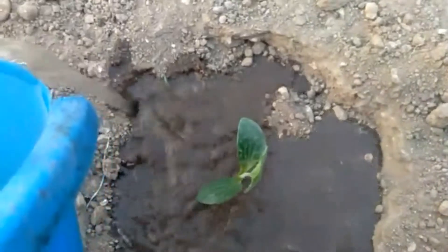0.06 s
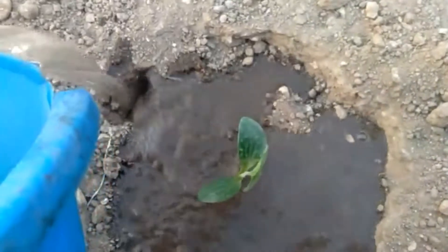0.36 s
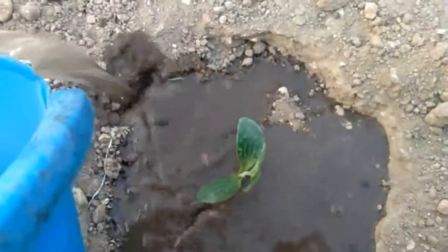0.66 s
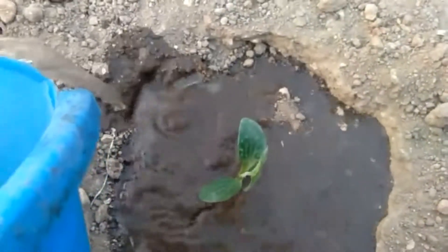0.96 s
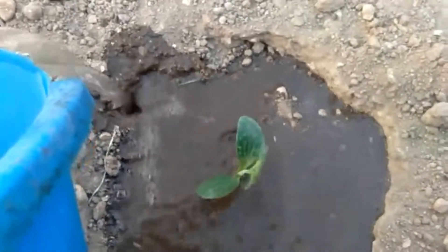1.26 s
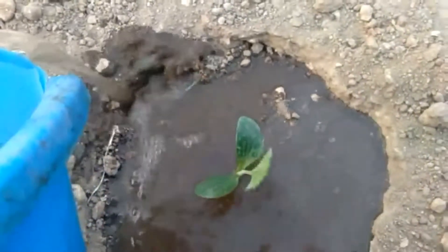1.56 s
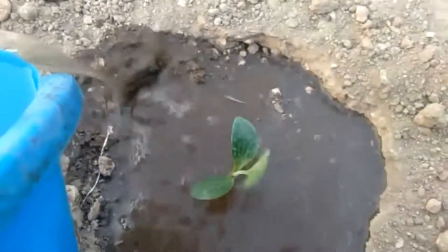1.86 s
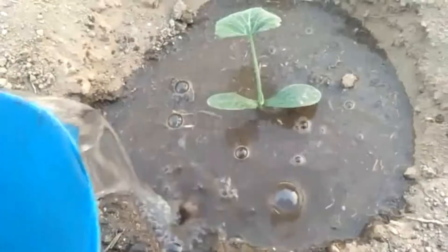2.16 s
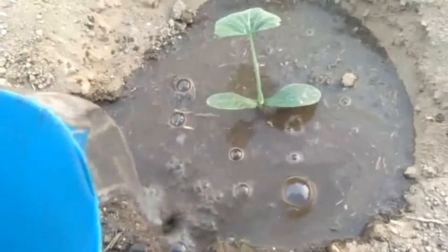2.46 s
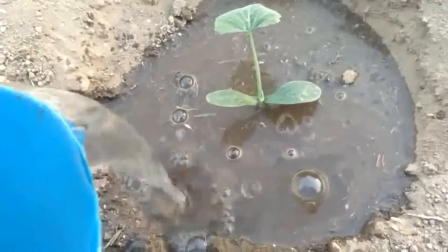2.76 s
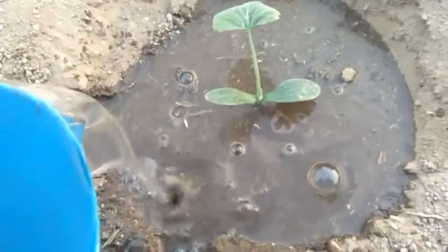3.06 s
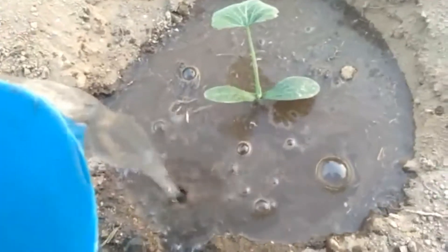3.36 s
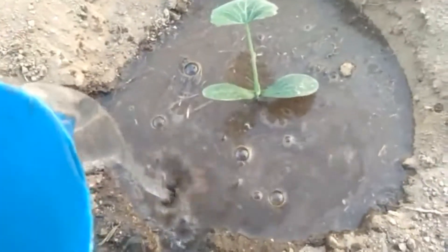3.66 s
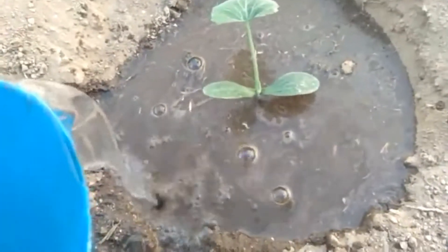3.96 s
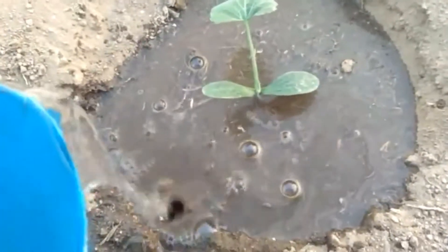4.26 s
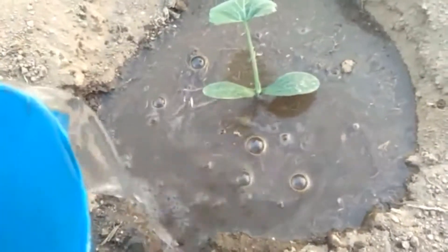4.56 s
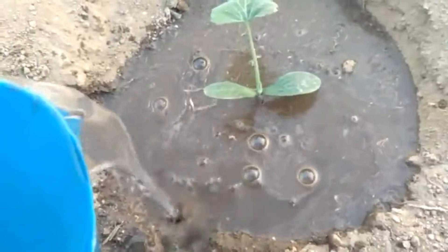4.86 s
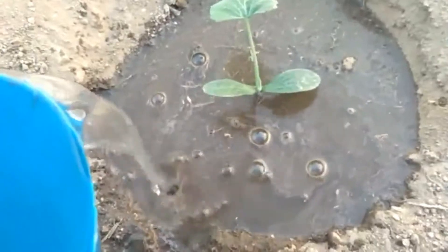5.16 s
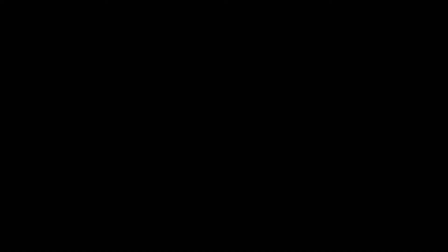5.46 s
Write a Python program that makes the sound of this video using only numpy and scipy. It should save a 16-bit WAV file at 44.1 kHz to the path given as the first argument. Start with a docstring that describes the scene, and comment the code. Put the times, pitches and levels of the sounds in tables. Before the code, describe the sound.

Two outdoor pours of water from a bucket: a soft splatter on soil under growing wind rumble, then a bubbly patter into a muddy pool.

```python
"""Water pours from a plastic bucket into the muddy basins of two seedlings, one after the other. The stream
breaks into slugs that spatter on the mud and trap tiny, quickly damped bubbles, with plips, chirps and ticks on
top. The first pour lands on soil; then the scene changes and the second drums softly into a pool. Outdoor air
lies underneath, and during the first pour wind buffets the microphone harder and harder."""
import sys
import numpy as np
from scipy import signal
from scipy.fft import rfft, irfft
from scipy.io import wavfile
from scipy.ndimage import uniform_filter1d, map_coordinates

SR = 44100
rng = np.random.default_rng(int(sys.argv[2]) if len(sys.argv) > 2 else 0)


def unload_audio(sound):
    """Save the sound as a 16-bit wav file, at the path given as the first command line argument."""
    columns = np.transpose(np.atleast_2d(sound))
    # keep every value between -1 and 1, then stretch to whole-number steps
    steps = np.round(np.clip(columns, -1, 1) * 32767)
    wavfile.write(sys.argv[1], SR, steps.astype(np.int16))


N = 252239
T = np.arange(N) / SR


def undb(db):
    """Decibels to gain."""
    return 10 ** (np.asarray(db) / 20)


def unit(x):
    """Scale to rms 1."""
    return x / np.sqrt(np.mean(x ** 2) + 1e-18)


def curve(rows):
    """An automation lane: (time, value) points joined by straight lines."""
    return np.interp(T, *np.transpose(rows))


def swell(middle_s, half_s):
    """A smooth rise and fall around one moment, 1 at its top."""
    return np.exp(-((T - middle_s) / half_s) ** 2)


def flicker(seconds):
    """A random wobble of rms 1 that changes over about this time."""
    width = int(seconds * SR)
    return unit(uniform_filter1d(uniform_filter1d(rng.standard_normal(N), width), width))


def gate(start_s, end_s, fade_s=0.0042):
    """Open between two times, with quick fades."""
    return np.clip(np.minimum(T - start_s, end_s - T) / fade_s, 0, 1)


def add(out, start_s, sound):
    """Mix a short sound into a track."""
    i = min(max(int(start_s * SR), 0), N - 1)
    out[i:i + len(sound)] += sound[:N - i]


def colour(x, points, size=4096):
    """EQ through (Hz, dB) points, minimum phase so that attacks stay sharp; comes out at rms 1."""
    hz, db = np.transpose(points)
    bin_hz = np.maximum(np.fft.rfftfreq(size, 1 / SR), 1)
    gain = undb(np.interp(np.log(bin_hz), np.log(hz), db))
    cepstrum = irfft(np.log(gain))
    cepstrum[1:size // 2] *= 2
    cepstrum[size // 2 + 1:] = 0
    impulse = irfft(np.exp(rfft(cepstrum)))
    return unit(signal.fftconvolve(x, impulse)[:N])


def smear(x, seconds):
    """Give every impulse an exponential tail."""
    return signal.lfilter([1], [1, -np.exp(-1 / (seconds * SR))], x)


def steady(x, seconds=0.14):
    """Keep the fine grain of x but hold its slow level at 1."""
    width = int(seconds * SR)
    power = uniform_filter1d(uniform_filter1d(x ** 2, width), width)
    return x / np.sqrt(power + 1e-9)


# Tone of the outdoor bed: freq_hz, gain_db
AIR_EQ = [(30, -19), (100, -6.5), (330, 12), (500, -6), (1200, 0), (3000, -14.5), (9000, -13),
          (15000, -52.5)]
def outdoor_air():
    """A faint, even bed of dark noise."""
    return undb(-56) * colour(rng.standard_normal(N), AIR_EQ)


# Wind ride, a light breeze and then one growing gust: time_s, relative_db
WIND_RIDE = [(0, -46), (1.05, -44.5), (1.25, -30), (1.72, -31), (1.97, -22.5), (2.1, -18.5), (2.16, -65.5),
             (5.32, -42.5)]
# Soft puffs on top of the ride: middle_s, half_length_s, relative_db
WIND_PUFFS = [(0.114, 0.06, -38), (0.234, 0.048, -35), (0.496, 0.019, -29.5), (3.644, 0.038, -33.5),
              (5.05, 0.031, -48)]
# Tone of wind pressure on the microphone: freq_hz, gain_db
RUMBLE_EQ = [(20, -40), (45, -2.5), (80, 9), (150, 0), (300, -6.5), (500, -16), (800, -46), (1500, -51),
             (5000, -120)]
def wind_rumble(gustiness_db=9, trim_db=-1):
    """Turbulence presses on the microphone: a rough, low rumble that follows the breeze."""
    puffs = sum(undb(db) * swell(middle_s, half_s) for middle_s, half_s, db in WIND_PUFFS)
    breeze = undb(curve(WIND_RIDE)) + puffs
    gusts = unit(uniform_filter1d(rng.standard_normal(N), SR // 80))
    turbulence = rng.standard_normal(N) * undb(gustiness_db * gusts)
    rumble = steady(colour(turbulence, RUMBLE_EQ), seconds=0.012)
    return rumble * breeze * undb(trim_db)


# Thumps of the strongest eddies: middle_s, push_db, pitch_hz, core_db
# core_db is the level of the eddy's tight, higher-pitched core, before its 3.5 dB boost.
EDDY_HITS = [(0.16, -10, 270, -22), (0.314, -11.0, 190, -46), (0.579, -23.5, 159, -50),
             (0.664, -16.5, 107, -45), (0.83, -19.0, 158, -62), (0.908, -26.0, 171, -49),
             (1.171, -17.5, 210, -38), (1.228, -24, 168, -44), (1.258, -11.5, 148, -22.5),
             (1.299, -11, 212, -25), (1.367, -14.5, 157, -42), (1.404, -18, 227, -29),
             (1.533, -16.5, 141, -33), (1.552, -13, 177, -19.5), (1.612, -13, 212, -22),
             (1.619, -9.5, 180, -23), (1.657, -22.5, 172, -43), (1.675, -18, 96, -43),
             (1.765, -23.5, 120, -41), (1.773, -21, 115, -31.5), (1.832, -12.5, 136, -26),
             (1.846, -27, 115, -48), (1.877, -15.0, 164, -28), (1.908, -16, 235, -28),
             (1.922, -18.5, 190, -24), (1.948, -8, 128, -20.5), (1.963, -10.5, 170, -16.5),
             (1.966, -13.5, 176, -17), (1.977, -12.5, 121, -20), (2.003, -10, 296, -17),
             (2.01, -13, 278, -8), (2.02, -17.5, 166, -18), (2.036, -12.5, 124, -23),
             (2.086, -17, 194, -20), (2.098, -14.0, 210, -17), (5.035, -22.0, 120, -58)]
# Tone of the fine swirls around an eddy: freq_hz, gain_db
SWIRL_EQ = [(100, -5), (380, 3), (650, 0.5), (1200, -12.5), (1800, -47.5), (5000, -110)]
def wind_eddies(swirl_gate, push_cycles=0.54, core_hz=440, core_cycles=0.64, fray_s=0.007):
    """Each eddy pushes and pulls the diaphragm; its tight core frays into fine swirls."""
    thumps, fray = np.zeros(N), np.zeros(N)
    age = T[:4096] - T[2048]  # zero at the middle of the eddy
    for middle_s, push_db, hz, core_db in EDDY_HITS:
        push = np.sin(2 * np.pi * hz * age) * np.exp(-(age * hz / push_cycles) ** 2)
        core = np.cos(2 * np.pi * core_hz * age) * np.exp(-(age * core_hz / core_cycles) ** 2)
        add(thumps, middle_s + age[0], undb(push_db) * push + undb(core_db + 3.5) * core)
        add(fray, middle_s + age[0], undb(core_db - 11) * np.exp(-(age / fray_s) ** 2))
    swirls = fray * colour(rng.standard_normal(N), SWIRL_EQ)
    return thumps + swirls * swirl_gate


def reflected(x, echoes, sway=0.015):
    """Add close reflections whose delays drift a little as the hand sways."""
    drift = 1 + sway * flicker(0.38)
    return x + sum(gain * map_coordinates(x, [(T - delay_s * drift) * SR]) for delay_s, gain in echoes)


# Peaks and notches of the gap between pool and bucket wall: centre_hz, width_hz, gain_db
HOLLOW_BANDS = [(3120, 87, -8), (3920, 130, -3), (4440, 295, 2.5), (4610, 120, -5.5), (5690, 700, -6.5),
                (6370, 390, 7), (6750, 910, -5.5), (8830, 250, 4)]
def hollow(x):
    """The gap beside the bucket adds a hollow colour that stays put while the water moves."""
    for hz, width_hz, db in HOLLOW_BANDS:
        band = signal.lfilter(*signal.iirpeak(hz, hz / width_hz, fs=SR), x)
        x = x + (undb(db) - 1) * band
    return x


def bubble(hz, cycles, rise):
    """A trapped bubble swells briefly, rings down over `cycles` and rises in pitch."""
    age_cycles = np.arange(int(cycles * SR / hz) + 2) * hz / SR
    attack = 1 - np.exp(-(age_cycles / 2.6) ** 2)
    envelope = attack * np.exp(-np.log(1000) * age_cycles / cycles)
    phase = 2 * np.pi * age_cycles * (1 + rise * age_cycles / cycles)
    return envelope / envelope.max() * np.sin(phase)


def snap(start_s=2.931, decay_s=0.0012):
    """One surface bubble bursts close by: a sharp, very bright snap."""
    out, age = np.zeros(N), T[:1024]
    top_band = signal.butter(6, (8400, 14000), "band", fs=SR, output="sos")
    hiss = unit(signal.sosfilt(top_band, rng.standard_normal(len(age))))
    add(out, start_s, undb(-16) * bubble(hz=9400, cycles=21, rise=0.08))
    add(out, start_s, undb(-23) * hiss * np.exp(-age / decay_s))
    return out


# The sharpest ticks of flying drops: start_s, level_db, pitch_hz
TICK_HITS = [(0.223, -34, 7260), (2.478, -29.5, 4460), (2.585, -28, 4530), (2.757, -32.5, 7550),
             (3.137, -38, 6250), (3.21, -33.5, 7100), (3.306, -35, 11000), (3.34, -35.5, 9050),
             (3.462, -33, 6060), (3.477, -33, 7700), (3.785, -39, 8850), (3.819, -32, 7700),
             (3.894, -29.5, 4600), (4.103, -27, 5100), (4.142, -35, 8100), (4.2764, -38, 6550),
             (4.449, -29, 4340), (4.459, -34, 4400), (4.4826, -37, 6140), (4.594, -28.5, 4500),
             (4.613, -32.5, 8000), (4.66, -39, 9130), (4.68, -33, 8850), (4.809, -28, 4360),
             (4.816, -28.5, 4360), (4.866, -34, 4450), (4.885, -25.5, 4300), (4.897, -30, 4450),
             (4.939, -36, 4600), (5.036, -33.5, 6240)]
def ticks(mist_gain=0.34, mist_decay_s=0.0035):
    """Flying drops burst with a short, very bright tick and a spit of spray around the same pitch."""
    rings, mist, age = np.zeros(N), np.zeros(N), T[:1024]
    for start_s, db, hz in TICK_HITS:
        add(rings, start_s, undb(db) * bubble(hz, cycles=17, rise=0.081))
        noise = rng.standard_normal(len(age))
        band = signal.iirpeak(hz, Q=1.6, fs=SR)
        spray = unit(signal.lfilter(*band, signal.lfilter(*band, noise)))
        add(mist, start_s, undb(db) * spray * np.exp(-age / mist_decay_s))
    return rings + mist_gain * mist


# Larger bubbles that sing upward: start_s, level_db, start_pitch_hz
CHIRP_HITS = [(0.754, -34.5, 3300), (0.773, -34, 2380), (1.386, -26, 2650), (1.398, -26, 3030),
              (1.552, -32.5, 1576), (1.568, -32, 3780), (1.579, -38, 1310), (1.645, -28, 2550),
              (1.806, -30, 2850), (1.888, -36, 2950), (2.803, -33, 2680), (2.884, -37.5, 1180),
              (2.963, -31.5, 2340), (3.005, -28, 3320), (3.019, -30, 3520), (3.78, -25.5, 3280),
              (3.839, -31, 2250), (4.140, -41, 2130), (4.344, -26, 2880), (4.7423, -33, 3480),
              (4.937, -40, 4300), (5.007, -38.5, 3730), (5.128, -35, 2360)]
def chirps():
    """Bubbles that near the surface as they ring go up in pitch."""
    out = np.zeros(N)
    for start_s, db, hz in CHIRP_HITS:
        add(out, start_s, undb(db) * bubble(hz, cycles=50, rise=0.3))
    return out


# The loudest plips, where the stream traps a bubble: start_s, level_db, pitch_hz
PLIP_HITS = [(0.0313, -25, 2760), (0.3334, -27.5, 2060), (0.3651, -23, 2590), (0.579, -24, 2600),
             (0.7704, -26.5, 2560), (1.282, -27.5, 2280), (1.334, -27.5, 2170), (1.3808, -15.5, 2600),
             (1.5786, -25.5, 2210), (1.617, -28.5, 2730), (1.8055, -23, 2950), (1.8851, -21.5, 2800),
             (2.165, -25.5, 2000), (2.184, -25, 2200), (2.2477, -25.5, 2200), (2.3253, -24.5, 2110),
             (2.466, -23, 2390), (2.513, -27, 2620), (2.6505, -20, 2290), (2.7006, -17, 2480),
             (2.741, -24.5, 2740), (2.754, -20, 2740), (2.786, -21, 2780), (2.826, -31, 2250),
             (2.8424, -26.5, 2100), (2.909, -30.5, 2080), (2.945, -25.5, 2170), (2.9894, -19, 2140),
             (3.028, -24.5, 2520), (3.0308, -23, 2620), (3.045, -28.5, 2250), (3.086, -17, 2540),
             (3.138, -26, 2700), (3.1623, -30, 2500), (3.2088, -21, 2150), (3.274, -28, 2540),
             (3.291, -29, 2450), (3.3386, -16.5, 2380), (3.4068, -14, 2270), (3.463, -28, 2040),
             (3.561, -30.5, 2440), (3.587, -23, 2180), (3.597, -25, 2270), (3.675, -29, 2330),
             (3.6983, -26.5, 2410), (3.709, -30.5, 2090), (3.7613, -26, 2550), (3.784, -26, 2240),
             (3.946, -26.5, 3340), (3.9594, -18.5, 2340), (3.974, -25, 2290), (4.103, -31.5, 3440),
             (4.2198, -26, 2100), (4.2513, -28.5, 2170), (4.288, -26, 2670), (4.3427, -21.5, 2820),
             (4.375, -20, 2600), (4.4212, -23, 2200), (4.449, -28, 2810), (4.598, -27.5, 2770),
             (4.695, -29.5, 2440), (4.7789, -21, 2670), (4.807, -24.5, 2430), (4.8421, -21.5, 2670),
             (4.865, -29.5, 2850), (4.8825, -25, 2700), (4.896, -30, 2370), (4.9769, -21, 2430),
             (5.0216, -21, 2520), (5.035, -20.5, 2520), (5.0973, -24.5, 2850), (5.1334, -20.5, 2410),
             (5.166, -28.5, 2600), (5.225, -24.5, 2215), (5.309, -27, 2500)]
def plips(slap_s=0.001286, slap_gain=0.2, spit_gain=0.014, after_db=-11.5):
    """Large drops slap, spit and ring one bubble; as the crater closes a second one sings on, rising."""
    rings, slaps, age = np.zeros(N), np.zeros(N), T[:1024]
    slap_envelope = age / slap_s * np.exp(1 - age / slap_s)
    for start_s, db, hz in PLIP_HITS:
        noise = rng.standard_normal(len(age))
        after_hz = hz * np.exp(0.19 * noise[0])
        after_s = start_s + 0.0094 * np.exp(0.3 * noise[1])
        add(slaps, start_s - slap_s, undb(db) * noise * slap_envelope)
        add(rings, start_s, undb(db) * bubble(hz, cycles=11, rise=0.06))
        add(rings, after_s, undb(db + after_db) * bubble(after_hz, cycles=26, rise=0.34))
    splash = slap_gain * colour(slaps, POOL_EQ) + spit_gain * colour(slaps, SPRAY_EQ)
    return rings + np.std(slaps) * splash


def pulses(per_s, spread_db, max_size):
    """Randomly timed triggers, most of them small and a few strong."""
    fires = rng.random(N) < per_s / SR
    size = np.minimum(rng.exponential(size=N), max_size)
    return fires * undb(spread_db * size)


def slugs(per_s, spread_db, life_s, floor, gap_db=-5, gap_s=0.0126):
    """Envelope of a stream that arrives in uneven lumps and thins just before each large drop."""
    arrivals = pulses(per_s, spread_db, max_size=2.3)
    lumps = unit(smear(smear(arrivals, life_s), life_s / 2))
    gaps = np.zeros(N)
    for plip_s, _, _ in PLIP_HITS:
        add(gaps, plip_s - gap_s, np.hanning(int(gap_s * SR)))
    return (floor + lumps) * undb(gap_db * gaps)


def impacts(lumps, tail_s=0.0006, hiss_gain=1.1):
    """Droplets strike hardest where a lump lands: each a click and a tiny hiss."""
    hits = pulses(per_s=3400, spread_db=2.4, max_size=4) * lumps
    hiss = np.sqrt(smear(hits ** 2, tail_s)) * rng.standard_normal(N)
    clicks = hits * rng.choice([-1, 1], N)
    return steady(unit(clicks) + hiss_gain * unit(hiss))


def bubble_swarm(lumps, centre_hz, octaves, cycles, spread_db, count):
    """Tiny bubbles scattered around a pitch, damped fast by the mud and loudest inside a lump."""
    out, centre_hz = np.zeros(N), np.broadcast_to(centre_hz, N)
    births = rng.integers(0, N, count)
    scatter = rng.standard_normal((count, 3)).clip(-2, 2)
    for i, (pitch, life, size) in zip(births, scatter):
        hz = min(centre_hz[i] * 2 ** (octaves * pitch), SR / 3)
        ring = bubble(hz, cycles * np.exp(0.35 * life), rise=0.09)
        add(out, i / SR, lumps[i] * undb(spread_db * size) * ring)
    return steady(out)


# Tone of the fine spray: freq_hz, gain_db
SPRAY_EQ = [(3000, -50.5), (5600, 7), (6400, 0), (7300, 2), (9100, 1.5), (10800, -2), (12500, -9.5),
            (15000, -23.5)]
def stream(lumps, swarm, splash_eq, splash_ride, spray_ride, splash_trim_db, wobble_db, spit_db):
    """Splash and spray follow the same lumps of water; the stream wobbles and the spray spits unevenly."""
    droplets = impacts(lumps)
    fizz = bubble_swarm(lumps, centre_hz=8600, octaves=0.27, cycles=48, spread_db=2.6, count=2400)
    splash = steady(colour(droplets + swarm, splash_eq), seconds=0.09)
    thrown = (droplets + 0.5 * fizz) * lumps ** 0.4  # the hardest lumps throw the most spray
    spray = steady(colour(thrown, SPRAY_EQ), seconds=0.065)
    splash_db = curve(splash_ride) + splash_trim_db + wobble_db * flicker(seconds=0.024)
    spray_db = curve(spray_ride) + spit_db * flicker(seconds=0.025)
    return splash * undb(splash_db) + spray * undb(spray_db)


# Level rides of the splash on the soil and the spray above it: time_s, relative_db
SOIL_SPLASH_RIDE = [(0.02, -39), (0.27, -46.5), (0.37, -41.5), (0.58, -44.5), (0.72, -44.5), (0.9, -47),
                    (1.12, -42.5), (1.86, -43.5), (2.09, -47)]
SOIL_SPRAY_RIDE = [(0.05, -58.5), (0.38, -55.5), (0.52, -57.5), (0.9, -59.5), (1.0, -57.5), (1.4, -55),
                   (2.09, -58.5)]
# Tone of the splash on wet soil: freq_hz, gain_db
SOIL_EQ = [(300, -26.5), (800, -8), (1250, -10), (1500, -7.5), (2000, -6), (2800, -3.5), (3400, -9),
           (4300, -7), (5200, -12), (6500, -36), (9000, -43), (15000, -71)]
# Early reflections off the bucket and the first basin's rim: delay_s, gain
SOIL_REFLECTIONS = [(0.00172, 0.2), (0.00235, 0.097)]
def soil_pour(drops):
    """The stream lands on the soil at the rim: a fine, soft splatter."""
    lumps = slugs(per_s=240, spread_db=2.7, life_s=0.002, floor=0.7)
    swarm = bubble_swarm(lumps + 0.6, centre_hz=2830, octaves=0.32, cycles=19, spread_db=1.8, count=4500)
    water = stream(lumps, 0.6 * swarm, SOIL_EQ, SOIL_SPLASH_RIDE, SOIL_SPRAY_RIDE,
                   splash_trim_db=-0.5, wobble_db=1.5, spit_db=1.5)
    return reflected(water + drops, SOIL_REFLECTIONS)


# Level rides of the splash in the pool and the spray above it: time_s, relative_db
POOL_SPLASH_RIDE = [(2.16, -39), (2.56, -41), (3.0, -36.5), (3.35, -41.5), (3.53, -37.5), (3.65, -35),
                    (3.85, -39.5), (4.1, -39.5), (4.38, -39), (4.52, -46), (4.82, -38.5), (5.17, -36.5),
                    (5.32, -36.5)]
POOL_SPRAY_RIDE = [(2.3, -59), (3.0, -59.5), (4.5, -58), (4.68, -55.5), (4.78, -57.5), (5.2, -59)]
# Tone of the splash in the pool and of the low drumming under it: freq_hz, gain_db
POOL_EQ = [(300, -0.5), (850, 3), (1080, -3.5), (1320, 7.5), (1600, -7.5), (2150, 7.5), (2700, 3.5),
           (3300, 1.5), (4600, 2), (5100, -4), (5650, -17), (6350, -14), (7200, -34), (15000, -28.5)]
DRUM_EQ = [(25, -6.5), (70, -10), (120, 4.5), (265, -4.5), (320, -12), (430, -10.5), (630, -19.5),
           (900, -20), (1400, -37.5), (5000, -100)]
# Early reflections off the bucket and the second basin's rim: delay_s, gain
POOL_REFLECTIONS = [(0.00145, 0.067), (0.002, 0.087)]
def pool_pour(drops):
    """The stream plunges into standing water: a wet, bubbly patter over a soft drumming."""
    # For a moment the stream runs thin: separate drops, and smaller, higher bubbles.
    thin = swell(middle_s=4.62, half_s=0.24)
    full = slugs(per_s=180, spread_db=2.7, life_s=0.0018, floor=0.36)
    broken = slugs(per_s=120, spread_db=2.2, life_s=0.0013, floor=0.2)
    lumps = (1 - thin) * full + thin * broken
    bubble_hz = 2524 * 2 ** (0.524 * thin)
    churn = lumps + 0.7 * (1 - thin)
    swarm = bubble_swarm(churn, bubble_hz, octaves=0.39, cycles=25, spread_db=2.0, count=2700)
    drum = undb(-44) * colour(rng.standard_normal(N), DRUM_EQ)
    water = stream(lumps, 0.72 * swarm, POOL_EQ, POOL_SPLASH_RIDE, POOL_SPRAY_RIDE,
                   splash_trim_db=-3.5, wobble_db=1.9, spit_db=2.8)
    return reflected(hollow(drum + water + drops), POOL_REFLECTIONS)


# The two pours, soil then pool: start_s, end_s
POUR_CUES = [(0, 2.113), (2.144, 5.338)]
def scene():
    """Both pours in the open air with the wind on top, in mono."""
    soil_gate, pool_gate = (gate(*cue) for cue in POUR_CUES)
    pouring = soil_gate + pool_gate
    air = outdoor_air()
    drops = plips() + chirps() + ticks()
    soil = (soil_pour(drops) + air) * soil_gate
    pool = (pool_pour(drops) + snap() + air) * pool_gate
    wind = wind_rumble() * pouring + wind_eddies(pouring)
    return (soil + pool + wind)[None]


def record(dry, bass_hz=52, top_hz=15500):
    """The microphone thins the deep bass, and the top is cut steeply."""
    low_cut = signal.butter(2, bass_hz, "high", fs=SR, output="sos")
    high_cut = signal.ellip(8, 0.2, 80, top_hz, fs=SR, output="sos")
    return signal.sosfilt(high_cut, signal.sosfilt(low_cut, dry))


dry = scene()
out = record(dry)
unload_audio(out)
```